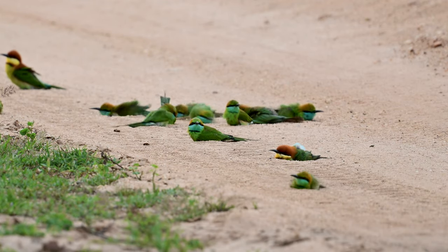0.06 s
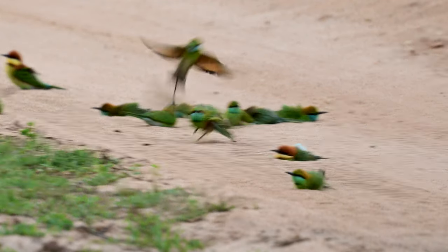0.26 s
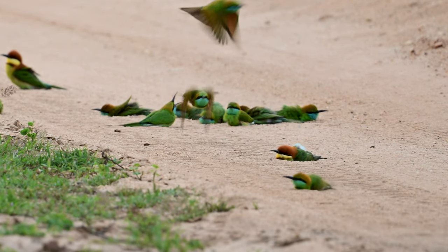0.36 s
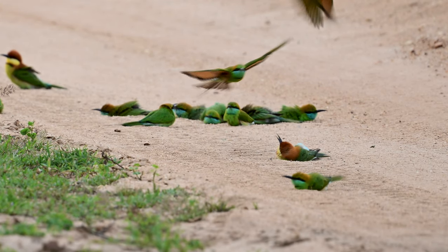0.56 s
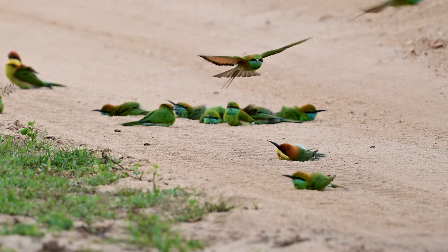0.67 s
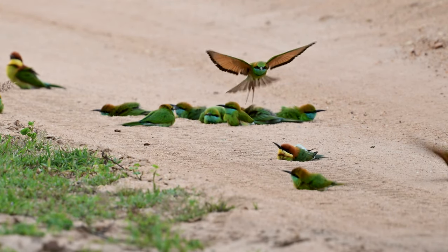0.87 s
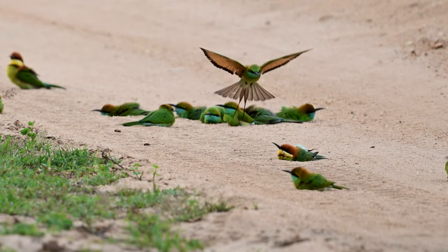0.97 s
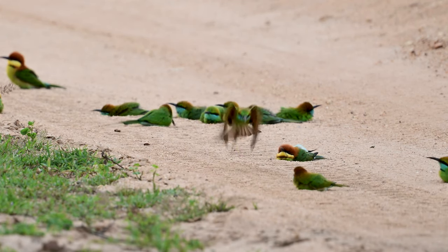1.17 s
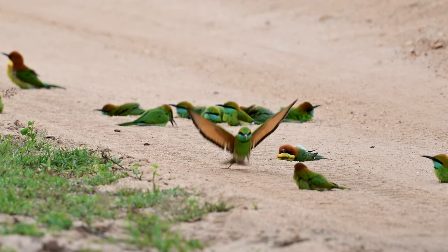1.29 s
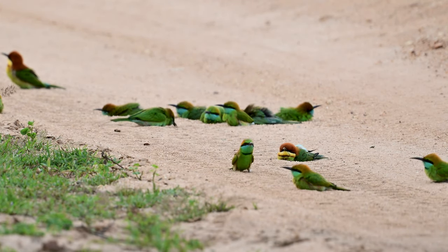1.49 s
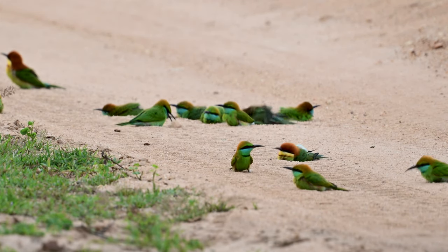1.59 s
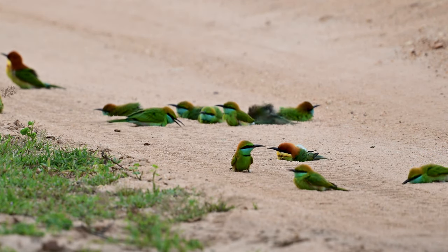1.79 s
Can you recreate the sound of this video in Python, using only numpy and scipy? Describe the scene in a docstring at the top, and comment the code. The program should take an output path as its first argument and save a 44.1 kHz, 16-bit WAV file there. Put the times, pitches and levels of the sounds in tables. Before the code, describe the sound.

Small birds call outdoors. A close one gives two clean pips, then another whistles up, down and up again. Farther birds add chirps, buzzes and a soft warble, all lightly echoing over low wind and distant noise.

```python
"""Small birds at the edge of a wood

Two clean, close pips, then a whistle that sweeps up, falls and lifts again: gliding, nearly pure tones.
Farther birds add short notes, a soft warble, thin high seeps and buzzes of narrow-band noise.
The trees scatter every call into a long tail. Underneath lie a low wind rumble and distant outdoor noise."""
import sys
import numpy as np
from scipy import signal
from scipy.fft import rfft, irfft
from scipy.io import wavfile
from scipy.ndimage import uniform_filter1d

SR = 44100
rng = np.random.default_rng(int(sys.argv[2]) if len(sys.argv) > 2 else 0)


def unload_audio(sound):
    """Save the sound as a 16-bit wav file, at the path given as the first command line argument."""
    columns = np.transpose(np.atleast_2d(sound))
    # keep every value between -1 and 1, then stretch to whole-number steps
    steps = np.round(np.clip(columns, -1, 1) * 32767)
    wavfile.write(sys.argv[1], SR, steps.astype(np.int16))


N = 81585
T = np.arange(N) / SR
FREQ_HZ = np.fft.rfftfreq(N, 1 / SR)
NOTE_EDGE_S, FAR_WAVER = 0.0058, 0.00518  # waver is a fraction of the pitch


def undb(db):
    """Decibels to gain."""
    return 10 ** (np.asarray(db) / 20)


def unit(x):
    """Scale to rms 1."""
    return x / np.sqrt(np.mean(x ** 2))


def pan(x, db):
    """Place a sound by its left-minus-right level."""
    return x * undb(np.array([[db], [-db]]) / 2)


def drift(rate_hz):
    """Smooth random movement with rms 1."""
    hop = max(int(SR / rate_hz), 1)
    steps = np.interp(np.arange(N) / hop, np.arange(2048), rng.standard_normal(2048))
    return unit(uniform_filter1d(steps, hop))


def eq_curve(points):
    """Gain at each frequency, drawn through (Hz, dB) points on a log axis."""
    hz, db = np.array(points).T
    return undb(np.interp(np.log(FREQ_HZ + 1), np.log(hz), db))


def gate(start, length, edge_s):
    """Smooth attack, hold and release."""
    ramp = np.clip(np.minimum(T - start, start + length - T) / edge_s, 0, 1)
    return np.sin(np.pi / 2 * ramp) ** 2


def syrinx(hz, gain, waver, overtones_db=()):
    """A bird's voice: a slightly wavering sine, with optional harmonics from the second up."""
    phase = 2 * np.pi * np.cumsum(hz * (1 + waver * drift(rate_hz=250))) / SR
    overtones = sum(undb(db) * np.sin(k * phase) for k, db in enumerate(overtones_db, 2))
    return np.sqrt(2) * gain * (np.sin(phase) + overtones)


def phrase(curve, waver, overtones_db=(), start=0, ratio=1):
    """Sing one pitch and level curve."""
    times, hz, db = np.array(curve).T
    envelope = gate(start + times[0], times[-1] - times[0], edge_s=0.00336)
    gain = undb(np.interp(T - start, times, db)) * envelope
    return syrinx(ratio * np.interp(T - start, times, hz), gain, waver, overtones_db)


def echoes(t60_s, treble_t60_s, onset_s, split_hz=5770):
    """Dense fading reflections, different in each ear, with a separate decay for the treble."""
    noise = rng.standard_normal((2, N))
    low = signal.sosfilt(signal.butter(4, split_hz, fs=SR, output="sos"), noise)
    high = signal.sosfilt(signal.butter(4, split_hz, "high", fs=SR, output="sos"), noise)
    fade = lambda t60: np.exp(-np.log(1000) * T / t60) * (1 - np.exp(-T / onset_s))
    return (low * fade(t60_s) + high * fade(treble_t60_s)) / np.linalg.norm(fade(t60_s))


def trees(x, scatter_db, tail_db, predelay_s=0):
    """Direct sound plus quick scatter from foliage and the long answer of the wood."""
    tail = echoes(t60_s=0.76, treble_t60_s=1, onset_s=0.009)
    tail = np.pad(tail, ((0, 0), (int(predelay_s * SR), 0)))[:, :N]
    scatter = echoes(t60_s=0.1, treble_t60_s=0.1, onset_s=0.003)
    response = undb(scatter_db) * scatter + undb(tail_db) * tail
    return x + signal.fftconvolve(x, response, axes=1)[:, :N]


def air():
    """A wide bed of distant noise over a central wind rumble that slowly grows."""
    # tone of the bed: frequency_hz, relative_level_db
    spectrum = [(20, -5), (36, -6), (49, 4.5), (70, -6.5), (98, -5), (125, -12.5), (220, -9), (500, -17),
                (1000, -19.5), (1450, -27), (2300, -16), (3500, -24.5), (5000, -34.5), (7000, -42.5),
                (10000, -43.5), (16000, -44)]
    # stereo width of the bed: frequency_hz, side_minus_mid_db
    width = [(30, -27), (80, -14.5), (170, -12.5), (350, 0), (800, -1.5), (12000, -1.5)]
    low_cut = FREQ_HZ / np.hypot(FREQ_HZ, 20)
    mid, side = rfft(rng.standard_normal((2, N))) * eq_curve(spectrum) * low_cut
    stereo = mid + np.array([[1], [-1]]) * side * eq_curve(width)
    bass = 1 / (1 + (FREQ_HZ / 100) ** 4)  # the wind sits below 100 Hz
    swell_db = T - T.mean() + drift(rate_hz=4.56)  # rises 1 dB a second, flickers by 1 dB
    wind = irfft(stereo * bass, N) * undb(swell_db)
    distance = irfft(stereo * (1 - bass), N) * undb(0.13 * drift(rate_hz=6))
    return undb(-34) * (wind + pan(distance, db=2.5)) / np.std(irfft(mid, N))


def short_notes():
    """Scattered far birds sing brief notes, each bending through three pitches."""
    # far notes: start_s, length_s, start_hz, middle_hz, end_hz, level_db, left_minus_right_db
    notes = [(-.03, 0.12, 2450, 2392, 2470, -38.5, -2.5), (0.019, 0.071, 3920, 3900, 3880, -37, 3),
             (.275, 0.097, 3270, 3046, 3180, -38.5, 8), (0.304, .036, 2640, 2680, 2630, -28, -9),
             (.351, .042, 3280, 2880, 2350, -24, 3), (0.463, 0.069, 3850, 3840, 3750, -43.5, -3.5),
             (.545, 0.1036, 4130, 4250, 4320, -40, -1.5), (0.659, 0.13, 4270, 4400, 4230, -49, -2),
             (0.646, 0.06, 2480, 2773, 2820, -33.5, -1.5), (.618, .055, 5750, 6200, 6380, -55, 0),
             (0.658, .13, 6200, 6370, 6200, -52, 2), (0.807, 0.044, 3330, 3240, 3240, -36.5, -9),
             (0.951, 0.12, 4270, 4320, 4200, -41, -0.5), (1.512, 0.033, 2300, 2190, 2000, -32, 0),
             (1.568, 0.014, 5730, 5500, 4580, -53, 9), (1.604, 0.038, 2560, 2310, 2310, -36, -3),
             (1.604, 0.069, 5560, 5540, 5484, -54.5, 4), (1.74, 0.086, 3470, 3567, 3600, -48.5, -2),
             (1.758, .095, 2630, 2550, 2750, -45.5, -7), (1.771, 0.19, 2080, 2000, 2100, -43, -3),
             (1.807, 0.061, 3180, 3090, 2970, -50.5, -13)]
    calls = np.zeros((2, N))
    for start, length, first, middle, last, db, side in notes:
        arc = np.polyfit([0, .5, 1], [first, middle, last], 2)
        hz = np.polyval(arc, np.clip((T - start) / length, 0, 1))
        calls += pan(syrinx(hz, undb(db) * gate(start, length, NOTE_EDGE_S), FAR_WAVER), side)
    return calls


def buzzes():
    """Raspy far calls: soft-edged bursts of narrow-band noise."""
    # buzzy calls: start_s, length_s, centre_hz, width_hz, level_db
    bursts = [(-.01, 0.037, 4690, 600, -34.5), (-.07, 0.33, 5900, 2720, -45),
              (0.091, 0.048, 4220, 395, -32.5), (0.155, 0.18, 4170, 800, -38),
              (0.34, 0.073, 8630, 750, -50.5), (0.527, 0.042, 3460, 704, -35)]
    calls = np.zeros(N)
    for start, length, hz, width, db in bursts:
        band = np.exp(-2 * ((FREQ_HZ - hz) / width) ** 2)
        rasp = unit(irfft(rfft(rng.standard_normal(N)) * band, N))
        calls += undb(db) * gate(start, length, length / 3) * rasp
    return calls


def pips():
    """The nearest bird pips twice: a thin lead-in drops and breaks onto a clean held note."""
    # contour of one pip: time_from_note_start_s, pitch_hz, level_db
    contour = [(-.034, 5050, -44), (-.022, 5350, -32), (-.011, 5480, -28), (-.006, 3900, -22),
               (-.003, 3480, -13), (0, 3280, -15), (.0015, 2470, -14), (.005, 2485, -8), (.017, 2495, -1.2),
               (.044, 2498, 0), (.048, 2330, -17), (.056, 1950, -22), (.064, 1750, -42)]
    # the two pips: start_s, pitch_ratio, gain_db, left_minus_right_db
    cues = [(.121, 1.005, -10.3, 0), (.431, .993, -7.2, .5)]
    calls = np.zeros((2, N))
    for start, ratio, db, side in cues:
        pip = phrase(contour, waver=0.0028, overtones_db=(-57, -47.5), start=start, ratio=ratio)
        calls += pan(undb(db) * pip, side)
    return trees(calls, scatter_db=-24, tail_db=-9.5, predelay_s=.01)


def warble():
    """A distant bird on the right sings one soft, low, winding line."""
    # contour of the warble: time_s, pitch_hz, level_db
    contour = [(.44, 1886, -45), (.456, 1935, -38), (.53, 1884, -41), (.604, 1725, -49.5), (.65, 1856, -42),
               (.70, 2036, -37.5), (.775, 2108, -38.5), (.835, 1990, -41), (.882, 2053, -65),
               (.948, 1897, -51), (1.01, 1980, -39.5), (1.05, 2148, -32), (1.09, 2360, -40),
               (1.12, 2300, -34)]
    return pan(phrase(contour, FAR_WAVER), db=-11.5)


def seeps():
    """A very small bird repeats a thin, high call with two voices at once."""
    # 60 ms calls: start_s, level_db
    cues = [(.775, -51.5), (0.924, -51.5), (1.12, -54.5), (1.385, -56), (1.504, -57)]
    gain = sum(undb(db) * gate(start, .06, NOTE_EDGE_S) for start, db in cues)
    return syrinx(hz=7530, gain=gain, waver=.014) + syrinx(hz=8200, gain=undb(-6) * gain, waver=.014)


def whistler():
    """A bird in the trees, just right of centre, whistles three gliding notes."""
    # contours of the three glides: time_s, pitch_hz, level_db
    upsweep = [(.828, 2470, -36), (.843, 2720, -25), (.861, 2886, -22.5), (.891, 3373, -13.5),
               (.911, 3824, -23), (.920, 4200, -31.5), (.927, 4860, -28)]
    downsweep = [(1.004, 5610, -42.5), (1.017, 4906, -37), (1.033, 4320, -26.5), (1.062, 3645, -19),
                 (1.082, 3340, -13), (1.118, 2900, -17.5), (1.155, 2567, -14.5), (1.179, 2410, -16),
                 (1.206, 2235, -25.5), (1.248, 2110, -35.5), (1.266, 2095, -24.5), (1.288, 2060, -25),
                 (1.3, 2052, -54)]
    lift = [(1.305, 2089, -28), (1.32, 2298, -24.5), (1.337, 2707, -17.5), (1.35, 2929, -20),
            (1.365, 2925, -30)]
    song = sum(phrase(glide, waver=0.0038, overtones_db=(-33, -46)) for glide in (upsweep, downsweep, lift))
    return trees(pan(song, db=-1), scatter_db=-4.5, tail_db=-5.5)


def scene():
    """Two lead birds in front, a wetter chorus deeper in the wood, open air underneath."""
    leads = pips() + whistler()
    chorus = warble() + short_notes() + seeps() + buzzes()
    return leads + trees(chorus, scatter_db=-6, tail_db=-3.5) + air()


def record(dry):
    """A steep low-pass cuts the top above 15.8 kHz."""
    return signal.sosfilt(signal.ellip(10, .1, 80, 15800, fs=SR, output="sos"), dry)


dry = scene()
out = record(dry)
unload_audio(out)
```